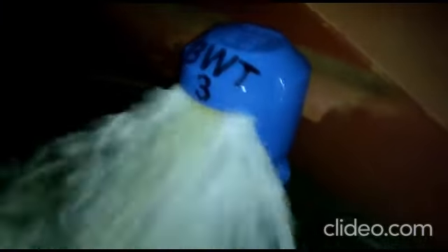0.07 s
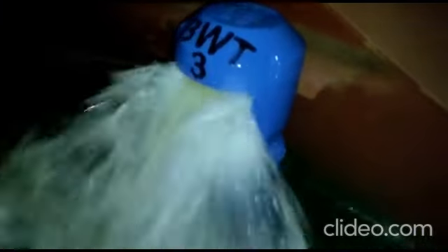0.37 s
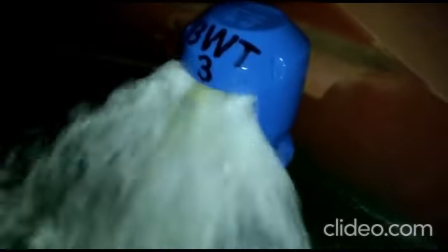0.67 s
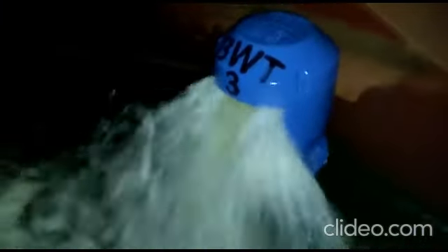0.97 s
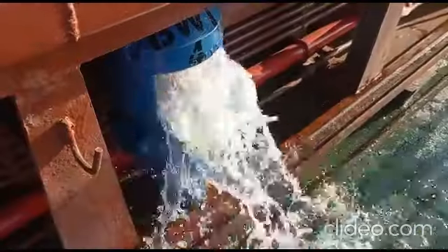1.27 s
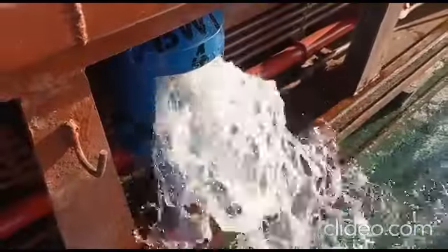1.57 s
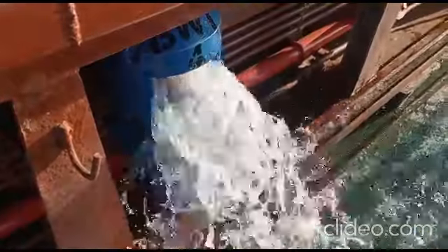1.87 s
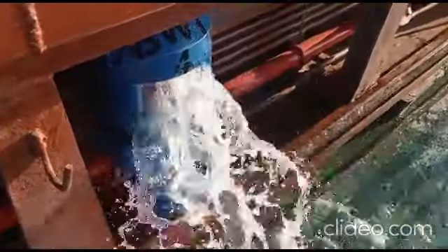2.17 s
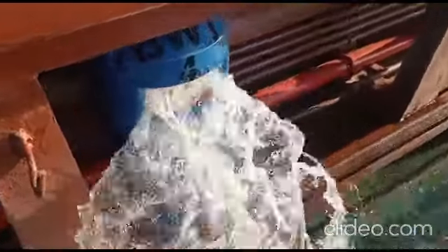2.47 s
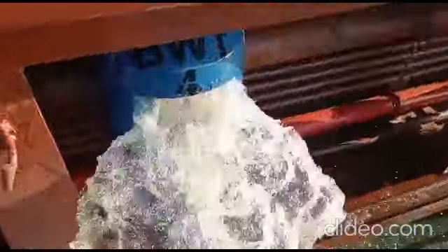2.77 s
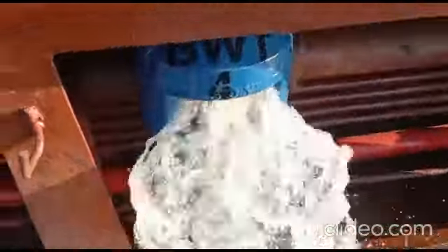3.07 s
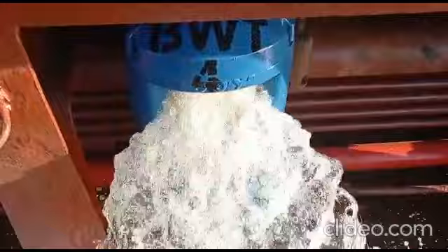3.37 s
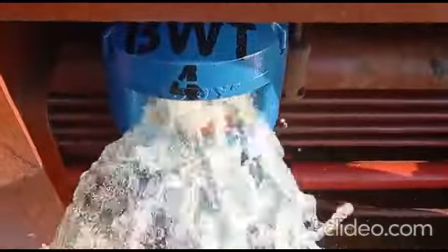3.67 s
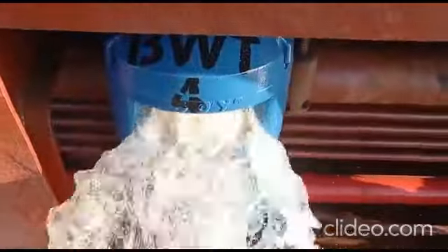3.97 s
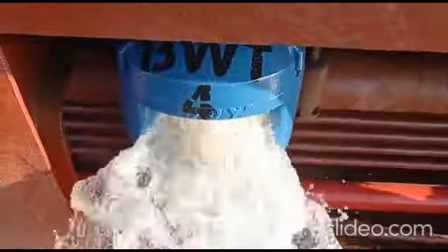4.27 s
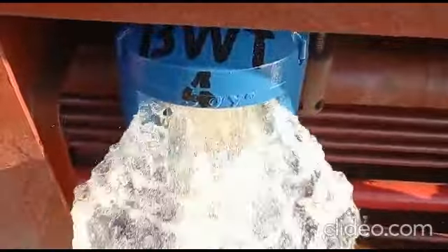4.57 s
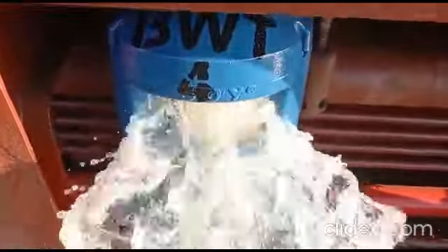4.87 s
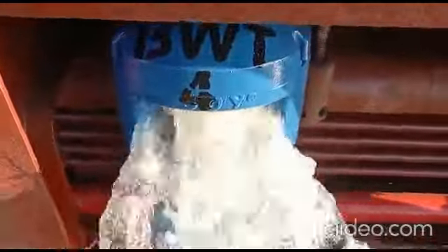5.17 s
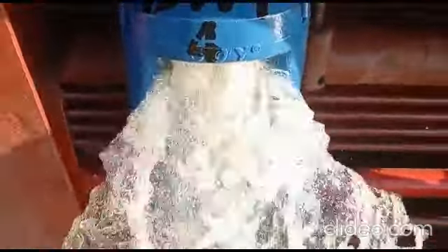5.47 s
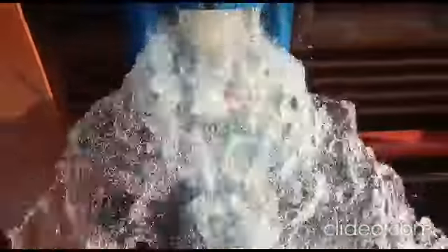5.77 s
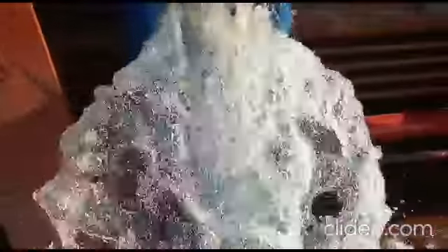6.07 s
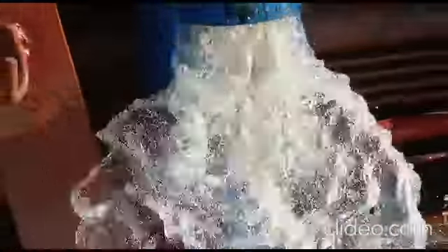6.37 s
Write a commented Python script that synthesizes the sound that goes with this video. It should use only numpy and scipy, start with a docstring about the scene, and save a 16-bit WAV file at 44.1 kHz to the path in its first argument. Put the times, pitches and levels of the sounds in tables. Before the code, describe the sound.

From the start, water gushes loudly out of a ship's tank vent onto a steel deck: a dense, steady roar with a bright, spurting hiss of spray, some bubbling and a faint ring of metal. Low wind rumbles underneath, and a sharp slap lands at about 0.5 seconds. Just before 1.2 seconds the gush cuts off abruptly. After a tiny gap, a quieter, looser flow fades in by 1.4 seconds, splashing in uneven clumps of drops with a light froth. It swells around 1.6 and 2.6 seconds. Heavy lumps of water slap the deck often between 1.4 and 3.3 seconds, then more sparsely, near 4.5, 4.8, 5.4 and 6 seconds. Short, dull puffs of wind thump the microphone throughout, strongest around 2.8, 3.8, 4.4, 5.5 and 6 seconds. The splashing continues until the end at about 6.5 seconds.

```python
"""A hard, steady gush roars and hisses: ballast water overflows from a ship's tank vent onto the deck.
Its impacts make broadband noise, ring the steel and trap bubbles that resonate. The gush stops abruptly
and a second scene fades in: a looser flow that lands in clumps of drops and heavy slaps.
In both scenes, turbulent puffs of wind thump on the microphone."""
import sys
import numpy as np
from scipy import signal
from scipy.fft import rfft, irfft, next_fast_len
from scipy.io import wavfile
from scipy.ndimage import map_coordinates

SR = 44100
rng = np.random.default_rng(int(sys.argv[2]) if len(sys.argv) > 2 else 0)


def wrap_up_sound(samples):
    """Save the sound to the file named by the first command line argument, as 16-bit audio."""
    columns = np.atleast_2d(samples).T
    # keep every value between -1 and 1, then stretch to whole-number steps
    tamed = np.clip(columns, -1, 1)
    steps = np.round(tamed * 32767).astype(np.int16)
    wavfile.write(sys.argv[1], SR, steps)


N = 287532
TIME = np.arange(N) / SR
GUSH_END_S, FLOW_START_S = 1.163, 1.204


def amp(db):
    """Decibels to amplitude ratio."""
    return 10 ** (np.asarray(db) / 20)


def unit(x):
    """Normalisation to rms 1."""
    return x / np.sqrt(np.mean(x ** 2) + 1e-20)


def curves(rows):
    """Linear interpolation: one value per sample for each column after the time."""
    times, *columns = np.transpose(rows)
    return [np.interp(TIME, times, column) for column in columns]


def wobble(rate):
    """Smooth random modulation of rms 1: a spline through rate knots a second."""
    return unit(map_coordinates(rng.standard_normal(4096), [TIME * rate], mode="wrap"))


def filtered(x, response):
    """Linear filtering: the spectrum of x times a frequency response."""
    size = next_fast_len(N + 8192)
    return irfft(rfft(x, size) * response(np.fft.rfftfreq(size, 1 / SR)), size)[:N]


def coloured(x, spectrum):
    """Spectral shaping by (frequency [Hz], gain [dB]) points on a log axis, to rms 1."""
    f, db = np.transpose(spectrum)
    return unit(filtered(x, lambda hz: amp(np.interp(np.log(hz + 1), np.log(f), db))))


def impacts(rate, spread_db):
    """Poisson process: rate impulses a second, with sizes scattered in dB."""
    return (rng.random(N) < rate / SR) * amp(spread_db * np.clip(rng.standard_normal(N), -2, 2))


def patter(rate, spread_db, wash_db):
    """Shot noise: single drop ticks over the Gaussian wash of countless far ones."""
    ticks = impacts(rate, spread_db) * rng.choice([-1, 1], N)
    return unit(unit(ticks) + amp(wash_db) * rng.standard_normal(N))


def clumps(rate, spread_db, life_s, share):
    """Amplitude modulation: a share of the power lands in clumps that drain exponentially."""
    power = signal.lfilter([1], [1, -np.exp(-1 / (life_s * SR))], impacts(rate, spread_db))
    return np.sqrt(1 - share + share * power / power.mean())


def bubbles(pitch_hz, scatter, cycles, spread_db, count):
    """Bubble resonance: trapped air rings as a damped oscillator, rising in pitch as it dies."""
    starts = (rng.random(count) * N).astype(int)[:, None]
    hz = np.clip(pitch_hz * np.exp(scatter * rng.standard_normal((count, 1))), 500, 6500)
    size = amp(spread_db * np.clip(rng.standard_normal((count, 1)), -2, 2))
    samples = np.arange(700)
    age = hz * samples / SR / cycles
    rings = size * amp(-30 * age) * np.sin(2 * np.pi * cycles * age * (1 + 0.11 * age))
    return unit(np.bincount((starts + samples).ravel(), rings.ravel(), N)[:N])


# Modes of the vent head and deck: (frequency [Hz], bandwidth [Hz], relative gain [dB])
STEEL_MODES = [(278.4, 12, 10), (636, 15, 5.5), (717, 13, -11), (1158, 22, -2), (2000, 20, 4),
               (2460, 16, -23)]
def steel_ring(blows):
    """Forced vibration: the water's blows excite narrow resonances of the steel."""
    return unit(filtered(blows, lambda f: sum(
        amp(db) * 1j * f * width / (hz ** 2 - f ** 2 + 1j * f * width)
        for hz, width, db in STEEL_MODES)))


# Course of the gush: (time [s], jet level [dB], spray level [dB])
GUSH_LEVELS = [(0, -20.5, -15.5), (0.17, -19.5, -15.5), (0.3, -20.5, -15.5), (0.55, -19, -15.5),
               (0.74, -21.5, -14.5), (0.79, -19, -13.5), (0.94, -19.5, -15), (1.03, -20.5, -13.5),
               (1.15, -22, -14)]
# Spectra of jet and spray: (frequency [Hz], relative level [dB])
JET_SPECTRUM = [(60, -27), (200, -10.5), (280, -8.5), (330, -11.5), (540, -4), (820, -7), (1100, -2.5),
                (1400, -5.5), (1750, -2), (2700, -6), (3700, -13.5), (7000, -24)]
SPRAY_SPECTRUM = [(1500, -20), (3700, -13), (5000, -8.5), (7000, -5), (8000, -3), (8900, -0.5),
                  (10000, -5.5), (11500, -11.5), (15800, -16.5)]
def gush():
    """Impact noise: the jet's dense blows merge into a roar, and its spray hisses in fast spurts."""
    jet_db, spray_db = curves(GUSH_LEVELS)
    spurts = clumps(rate=280, spread_db=7, life_s=0.0033, share=0.34)
    blows = patter(rate=3000, spread_db=4.5, wash_db=1.5)
    blows *= clumps(rate=170, spread_db=9, life_s=0.01, share=0.37)
    froth = bubbles(pitch_hz=1530, scatter=0.492, cycles=18, spread_db=6, count=3000)
    jet = unit(coloured(blows, JET_SPECTRUM) + amp(-19.5) * steel_ring(blows) + amp(-9) * froth)
    spray = coloured(patter(rate=7000, spread_db=3, wash_db=5) * spurts, SPRAY_SPECTRUM)
    return amp(jet_db) * jet + amp(spray_db) * spray


# Wind under the gush: (time [s], level [dB])
RUMBLE_LEVELS = [(0.0, -39), (0.268, -27), (0.46, -38), (0.492, -29.5), (0.71, -26), (0.73, -33),
                 (1.15, -40.5)]
# Its spectrum: (frequency [Hz], relative level [dB])
RUMBLE_SPECTRUM = [(10, -1), (25, 0), (90, -1.5), (180, -6), (400, -34), (1000, -64)]
def wind_rumble():
    """Turbulence: slow pressure fluctuations make a deep, wavering noise."""
    level_db, = curves(RUMBLE_LEVELS)
    rumble = coloured(rng.standard_normal(N), RUMBLE_SPECTRUM)
    return amp(level_db) * unit(rumble * amp(1.1 * wobble(18.5)))


# Strong puffs: (time [s], level [dB], centre frequency [Hz], half-width [s])
STRONG_PUFFS = [(.14, -24, 110, .014), (.698, -20.5, 250, .007), (1.44, -29, 189, 0.01),
                (1.545, -24.5, 149, 0.0084), (2.102, -23.5, 219, 0.013), (2.703, -22.5, 400, 0.015),
                (2.781, -18, 200, 0.0075), (2.846, -19, 676, 0.01), (3.026, -26, 340, .009),
                (3.323, -26, 161, 0.031), (3.516, -23, 278, .006), (3.765, -18, 473, 0.0055),
                (3.807, -19.5, 216, 0.01), (3.98, -20.5, 397, 0.0097), (4.056, -23, 447, 0.0065),
                (4.156, -24, 324, 0.018), (4.292, -23, 370, 0.0078), (4.446, -18.5, 335, 0.013),
                (4.597, -26.5, 284, 0.0077), (4.792, -25, 204, .022), (4.922, -22.5, 278, 0.0049),
                (5.161, -25, 307, 0.034), (5.301, -24.5, 244, 0.014), (5.449, -18, 520, 0.0073),
                (5.462, -22, 427, 0.0091), (5.479, -18.5, 302, 0.0056), (5.62, -19.5, 410, 0.018),
                (5.743, -21.5, 250, 0.011), (6.026, -18, 398, 0.0075), (6.275, -24.5, 340, 0.012),
                (6.31, -25, 282, 0.014)]
def wind_puffs(eddy_rate=700, low_hz=55, swirl=0.15, size=8192):
    """Pressure pulses: each puff is one kick among lesser eddies; faster ones reach higher in pitch."""
    out = np.zeros(N + 2 * size)
    middle = size // 2
    t, f = (np.arange(size) - middle) / SR, np.fft.rfftfreq(size, 1 / SR)
    for when, db, hz, half_width in list(STRONG_PUFFS) + lesser_puffs(count=40):
        swell = np.exp(-np.abs(t / half_width) ** 1.27)
        kicks = (rng.random(size) < eddy_rate / SR) * rng.standard_normal(size) * swell
        kicks[middle] = 1.1 * rng.choice([-1, 1])
        band = (1j * f / (1j * f + low_hz)) ** 2 / np.sqrt(1 + (f / (1.06 * hz)) ** 4.06)
        # eddies pass at a loosely regular rate, which favours the centre frequency
        emphasis = 1 + swirl * 1j * f * hz / (hz ** 2 - f ** 2 + 1j * f * hz)
        puff = irfft(rfft(kicks) * band * emphasis)
        puff *= amp(db) * np.linalg.norm(swell) / np.linalg.norm(puff)
        out[round(when * SR) - middle:][:size] += puff
    # the microphone passes little deep bass
    return filtered(out[:N], lambda f: f ** 4 / (f ** 4 + 52 ** 4))


# Lumps of water hitting the deck: (time [s], nominal peak level [dB], 60 dB decay time [s])
WATER_LUMPS = [(.537, -9, 0.067), (1.252, -27, 0.035), (1.294, -29, 0.082), (1.427, -20, .05),
               (1.622, -15, .07), (1.751, -13, .05), (1.88, -12.5, 0.054), (1.96, -11, .03),
               (2.345, -7.5, .01), (2.574, -10, .08), (2.623, -14, .05), (2.909, -13, .05),
               (3.286, -13, .05), (4.096, -15, .03), (4.489, -11.5, 0.032), (4.759, -14.5, 0.089),
               (5.408, -13.5, .05), (6.04, -11, 0.033)]
# Spectrum of slaps and drops: (frequency [Hz], relative level [dB])
SPLASH_SPECTRUM = [(60, -21), (200, -7.5), (450, -16.5), (800, -11), (1150, -7.5), (1600, -2), (2200, 0),
                   (3200, 0.5), (5000, -2.5), (6500, -4.5), (7200, -14.5), (8200, -28), (9800, -38),
                   (12000, -47)]
def slaps(smack_db=-5, smack_s=0.014, crest_db=11.5):
    """Impact transients: a lump lands with a sharp smack and breaks into a decaying burst of drops."""
    t, out = np.arange(SR // 8) / SR, np.zeros(N + SR)
    for when, db, drain_s in WATER_LUMPS:
        envelope = amp(-60 * t / drain_s) + amp(smack_db - 60 * t / smack_s)
        out[round(when * SR):][:len(t)] += amp(db - crest_db) * envelope * rng.standard_normal(len(t))
    return np.std(out[:N]) * coloured(out[:N], SPLASH_SPECTRUM)


# Swell of the loose flow: (time [s], level [dB])
FLOW_LEVELS = [(1.49, -34.5), (1.61, -25.5), (1.66, -28.5), (1.95, -27), (2.3, -29.5), (2.38, -33),
               (2.58, -25), (2.8, -29.5), (3.26, -31), (3.3, -28), (3.69, -27.5), (4.0, -33), (4.65, -30),
               (4.7, -36), (4.77, -30.5), (5.36, -29.5), (5.6, -29.5), (6.52, -29.5)]
# Fineness of the drops: (time [s], treble tilt [dB], mist relative to splash [dB])
DROP_BREAKUP = [(1.5, -0.3, -25.5), (2.7, -1.5, -25), (3.5, 0.6, -33), (4.5, 0, -33), (5.05, -1, -27),
                (5.7, 1, -46), (6.1, 3, -36), (6.52, 1.5, -42)]
# Spectra of the mist and of the recorder's fizz: (frequency [Hz], relative level [dB])
MIST_SPECTRUM = [(4000, -40), (8000, -5), (9500, -3), (11000, -4.5), (14000, -7.5), (15800, -14)]
RECORDER_FIZZ_SPECTRUM = [(13000, -42), (14100, -14), (14700, 2), (15800, 0)]
def loose_flow():
    """Sheet breakup: water parts into clumps of drops that froth on the deck and throw a fine mist."""
    flow_db, = curves(FLOW_LEVELS)
    tilt_db, mist_db = curves(DROP_BREAKUP)
    landing = clumps(rate=145, spread_db=5, life_s=0.009, share=0.56)
    drops = patter(rate=2500, spread_db=4.5, wash_db=0) * landing
    froth = bubbles(pitch_hz=2498, scatter=0.342, cycles=22, spread_db=5.5, count=2500) * landing
    splash = unit(coloured(drops, SPLASH_SPECTRUM) + amp(-9) * froth)
    # smaller drops shift the energy upward in frequency
    treble = filtered(splash, lambda f: f ** 3 / (f ** 3 + 3500 ** 3))
    splash = amp(tilt_db) * treble + amp(-tilt_db) * (splash - treble)
    # faint high fizz of the recorder near 15 kHz, following the drops
    recorder_fizz = amp(-23) * coloured(drops, RECORDER_FIZZ_SPECTRUM)
    mist = amp(mist_db) * coloured(drops, MIST_SPECTRUM)
    return amp(flow_db) * (splash + recorder_fizz + mist)


# Wind strength at the microphone: (time [s], relative level [dB])
BREEZE_LEVELS = [(1.35, -41.5), (1.57, -34), (1.75, -43.5), (2.45, -44), (2.86, -38.5), (3.22, -45),
                 (3.52, -34.5), (3.9, -37), (4.17, -33.5), (4.42, -39.5), (4.7, -39), (5.25, -34.5),
                 (5.55, -36), (5.9, -39.5), (6.3, -40), (6.52, -35.5)]
# Spectrum of its eddies: (frequency [Hz], relative level [dB])
EDDY_SPECTRUM = [(20, -30), (35, -36), (60, -10.5), (95, -3.5), (150, -1), (300, -8), (450, -15.5),
                 (900, -20), (2000, -48.5)]
def breeze(gain_db=3.5):
    """Intermittent turbulence: small eddies keep up a fitful rumble on the microphone."""
    level_db, = curves(BREEZE_LEVELS)
    eddies = rng.standard_normal(N) * amp(3.55 * wobble(70) + 3.6 * wobble(22))
    return amp(level_db + gain_db) * coloured(eddies, EDDY_SPECTRUM)


def lesser_puffs(count, above_breeze_db=2, spread_db=4, octaves_per_db=0.35, half_width_s=0.016):
    """Velocity scaling: rows of random puffs, louder and higher the stronger the breeze."""
    jitter, weakness = rng.random((count, 2)).T
    times = FLOW_START_S + (N / SR - FLOW_START_S) * (np.arange(count) + jitter) / count
    breeze_db = np.interp(times, *np.transpose(BREEZE_LEVELS))
    db = breeze_db + above_breeze_db + spread_db * (1 - 2 * weakness)
    hz = 270 * 2 ** (octaves_per_db * (db + 33))  # 270 Hz at -33 dB
    return [(*row, half_width_s) for row in zip(times, db, hz)]


def lulls(depth_db=-0.5, gather_s=0.032):
    """Conservation of mass: the stream's gain dips slightly while each lump gathers."""
    dip = sum((TIME < when) * np.exp(-np.abs(TIME - when) / gather_s) for when, _, _ in WATER_LUMPS)
    return amp(depth_db * dip)


def overload(puffs, above_hz=630, half_power_db=-31.5, recovery_s=0.013):
    """Compression: the gain left for the water while a fast puff overloads the microphone."""
    fast = filtered(puffs, lambda f: f ** 4 / (f ** 4 + above_hz ** 4))
    pole = np.exp(-1 / (recovery_s * SR))
    power = signal.lfilter([1 - pole], [1, -pole], fast ** 2)
    return 1 / np.sqrt(1 + power / amp(half_power_db) ** 2)


def scene(fade_s=0.18):
    """Superposition: the gush, a brief gap, then the loose flow, with puffs and slaps through both."""
    gate = np.clip((GUSH_END_S - TIME) / 0.001, 0, 1)
    fade_in = (TIME > FLOW_START_S) * np.clip(amp(-34) + (TIME - FLOW_START_S) / fade_s, 0, 1)
    puffs = wind_puffs()
    second_scene = fade_in * (overload(puffs) * lulls() * loose_flow() + breeze())
    lumps = slaps()
    noise_floor = amp(-67) * coloured(rng.standard_normal(N), JET_SPECTRUM)
    first_scene = gate * (gush() + wind_rumble())
    return (first_scene + second_scene + puffs + lumps + noise_floor)[None]


def record(dry, ceiling=0.78, top_hz=15800):
    """Saturation and band limiting: the tallest peaks are rounded, then a steep low-pass follows."""
    rounded = dry[0] / (1 + np.abs(dry[0] / ceiling) ** 8) ** (1 / 8)
    return filtered(rounded, lambda hz: 1 / (1 + (hz / top_hz) ** 300))[None]


dry = scene()
out = record(dry)
wrap_up_sound(out)
```